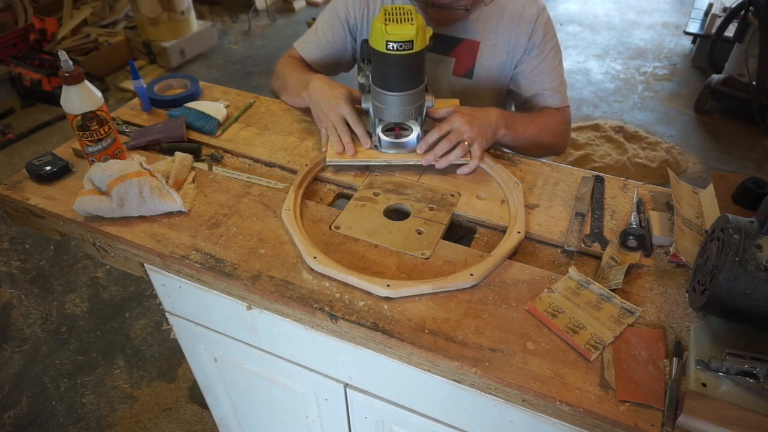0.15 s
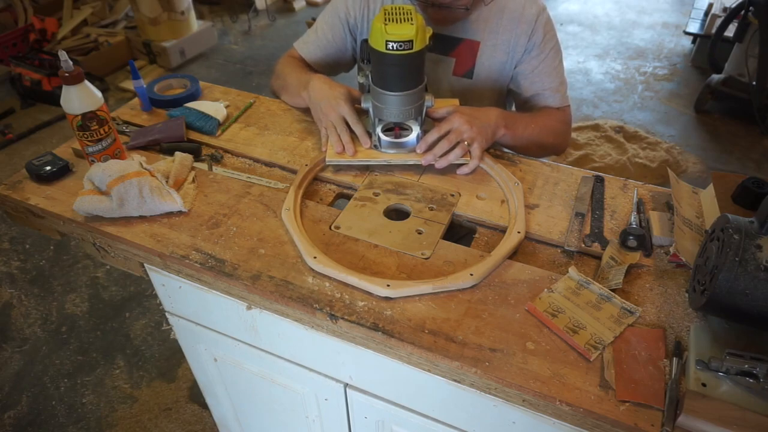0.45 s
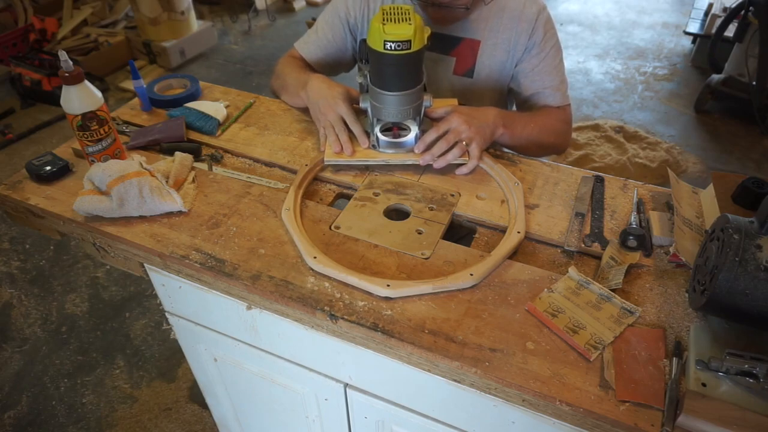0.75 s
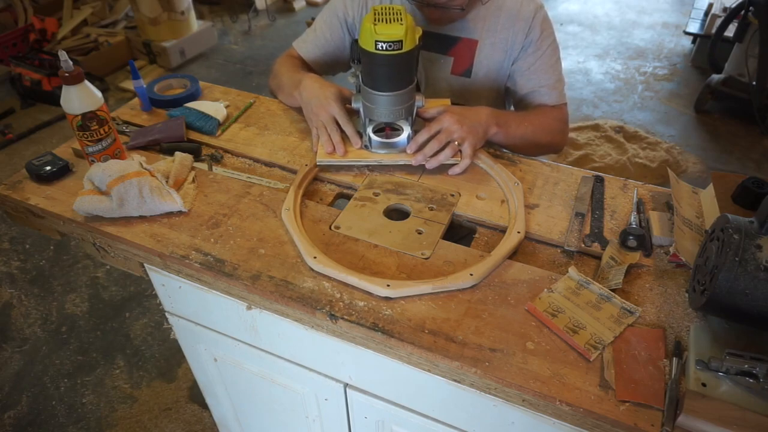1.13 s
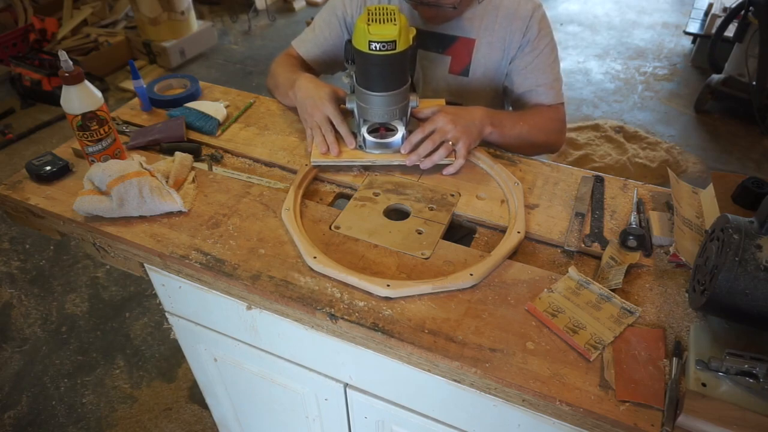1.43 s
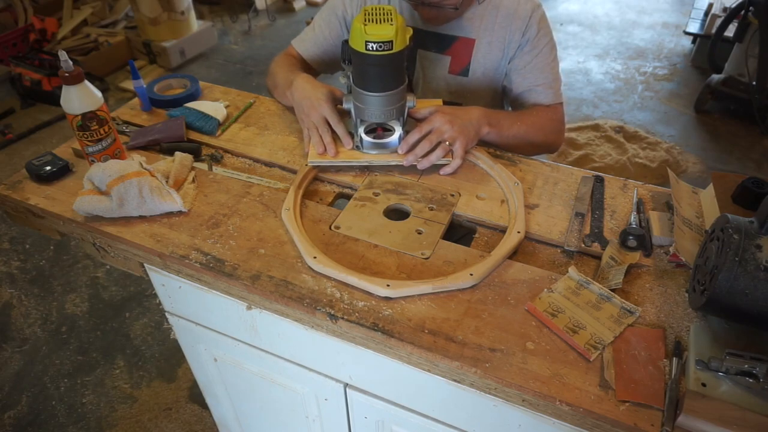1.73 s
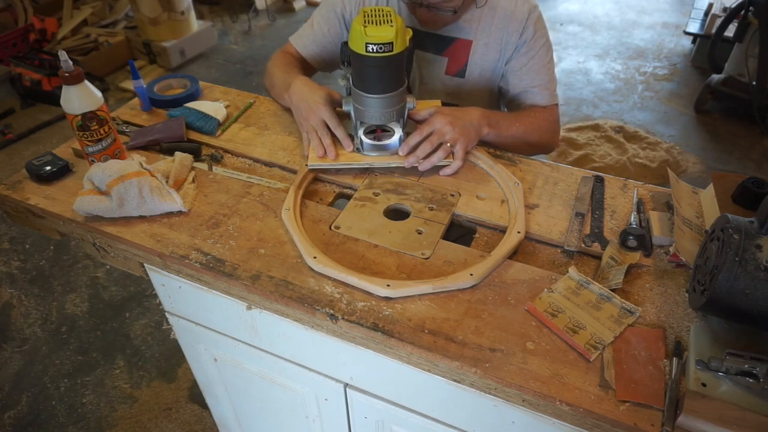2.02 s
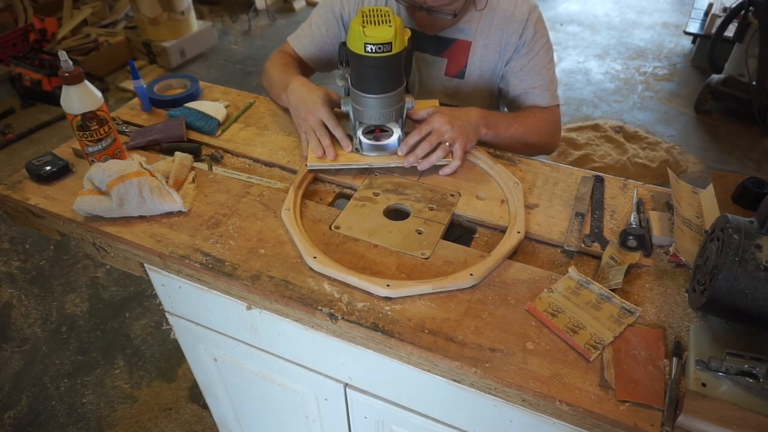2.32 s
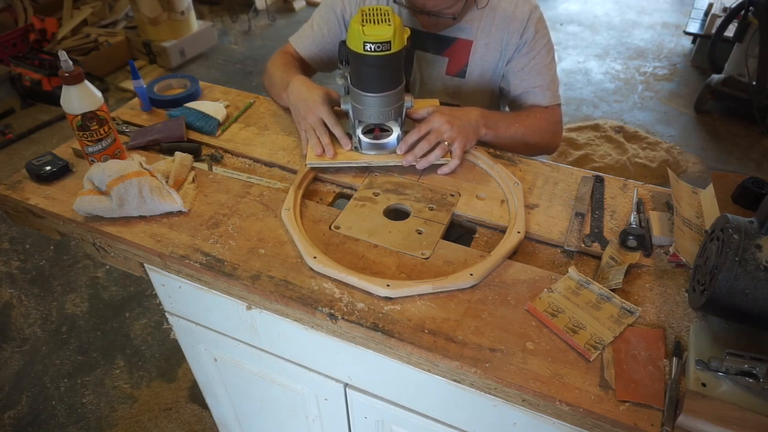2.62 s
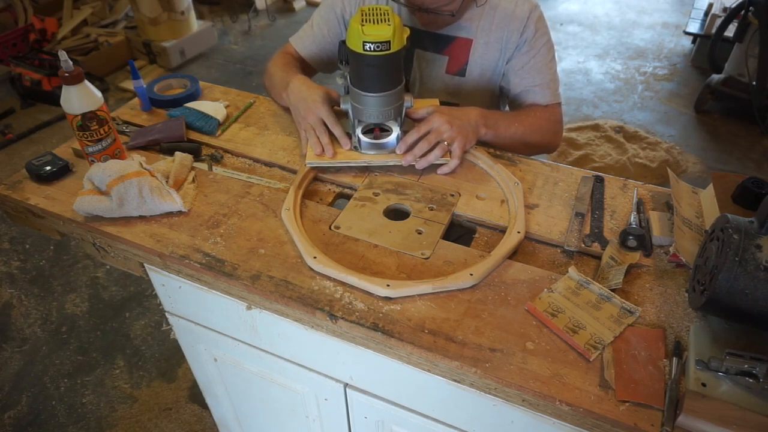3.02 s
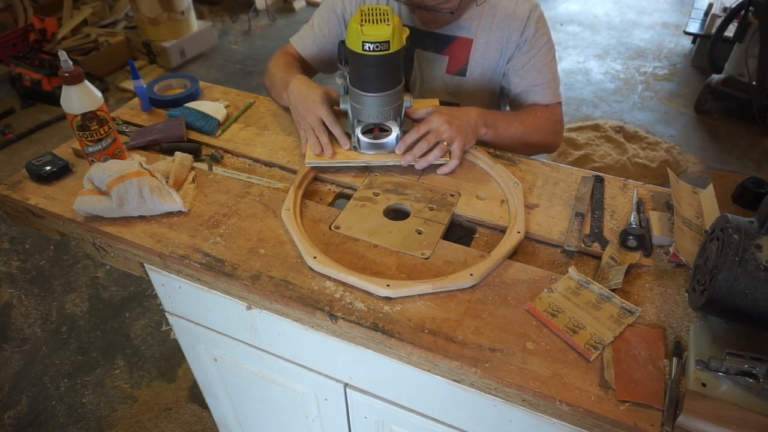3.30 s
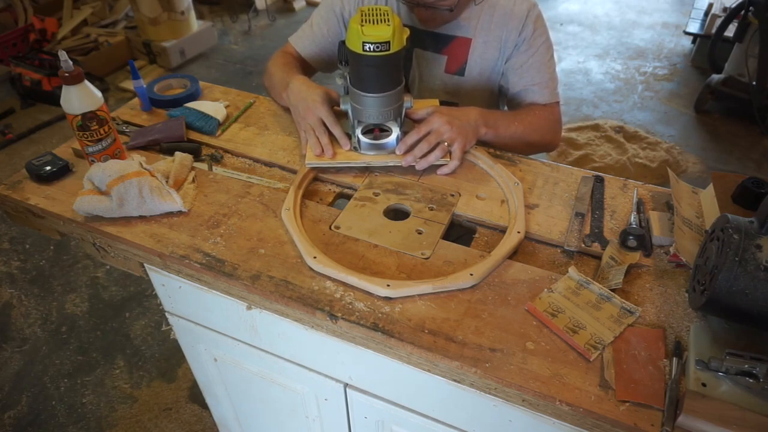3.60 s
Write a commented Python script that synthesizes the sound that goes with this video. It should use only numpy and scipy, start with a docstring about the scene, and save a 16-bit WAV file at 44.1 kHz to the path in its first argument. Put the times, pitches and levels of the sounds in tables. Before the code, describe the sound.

A handheld electric router runs at full speed on a workshop bench, its high whine sagging slightly and turning harsher as it cuts wood. Cooling air hisses loudly, and the exhaust flutters low on the close stereo microphone.

```python
"""At a workshop bench, a stereo microphone close to a handheld router that trims a wooden hoop flat out.
The spindle's whine sags and grows harsher where the bit bites, over a loud rush of cooling air that
rings in the housing. The exhaust blows straight on the microphone as a low flutter, which eases as
the tool moves along."""
import sys
import numpy as np
from scipy.fft import rfft, irfft, next_fast_len
from scipy.io import wavfile
from scipy.ndimage import uniform_filter1d, map_coordinates

SR = 44100
rng = np.random.default_rng(int(sys.argv[2]) if len(sys.argv) > 2 else 0)


def transcribe(signal):
    """Save signal, clipped to [-1, 1], as a 16-bit WAV file at the path in sys.argv[1]."""
    frames = np.atleast_2d(signal).T
    limited = np.clip(frames, -1, 1)
    pcm = np.round(limited * 32767).astype(np.int16)
    wavfile.write(sys.argv[1], SR, pcm)


N = 165375

# The spindle, slowing in the cuts. Each row: time in seconds, revolutions per second.
SPINDLE_SPEED = [(0.0, 430.3), (0.35, 428.7), (0.4, 429.6), (0.85, 428.7), (0.9, 427.6), (1.05, 427.9),
                 (1.25, 426.8), (1.55, 428.3), (1.95, 435.2), (2.2, 437.1), (2.7, 436.5), (2.8, 434.1),
                 (2.85, 430.7), (3.0, 433.1), (3.35, 425.2), (3.4, 426.0), (3.6, 434.6), (3.75, 435.7)]
# The whine's first and seventh partials. Each row: time in seconds, level in dB.
FIRST_PARTIAL = [(0.0, -41.5), (0.4, -46), (1.4, -35.5), (1.85, -37), (2.0, -33), (3.5, -40), (3.75, -33)]
SEVENTH_PARTIAL = [(0, -40), (.7, -42), (.92, -38), (1.08, -39), (1.22, -31), (1.36, -37), (1.6, -40),
                   (1.8, -55), (2.7, -55), (2.86, -35), (2.96, -46), (3.08, -39), (3.3, -38), (3.6, -49)]
# The third and fifth partials wander as the tool moves; the fourth flares as the bit digs in.
# Each row: time in seconds, level in dB, left over right in dB, left's lead in radians.
THIRD_PARTIAL = [(0, -30.5, 5.5, .8), (.55, -34, -6, 0.9), (.75, -25.5, 12, .8), (1.7, -25, 16, 0.89),
                 (1.9, -33, 14, 1.4), (2.08, -27, -2, 1.9), (2.8, -31, 1, 2.1), (2.9, -26, 12, 1.2),
                 (3.05, -40, 9, 1), (3.15, -28.5, 6, 1.3), (3.75, -31, 10, 1)]
FOURTH_PARTIAL = [(0, -47, 4, 3.6), (.8, -46, 5, 3.9), (1.3, -33, 9, 3.6), (1.65, -38, 9, 3.9),
                  (1.82, -31, 2, 4.3), (2.05, -46, -1, 3.2), (2.7, -42, 0, 3.4), (2.82, -27, 2, 4.6),
                  (2.94, -34, 0, 4), (3.06, -31, 2, 4.9), (3.24, -34, 0, 5.3), (3.34, -27, -2, 3.1),
                  (3.48, -46, 0, 3.6), (3.6, -37.5, 1, 4.1), (3.75, -42, 1, 3.6)]
FIFTH_PARTIAL = [(0, -33.5, -12, 4.3), (.85, -39, -8, 4.4), (1.25, -33, -6, 3.8), (1.58, -37, -16, 5),
                 (1.7, -26.5, -3, 4.8), (1.84, -27.5, 0, 4.2), (1.98, -31, -14, 4.1), (2.7, -30, -15, 3.6),
                 (2.82, -25, -2, 4.6), (3.05, -25, -4, 4.5), (3.17, -32, -10, 4.5), (3.4, -30, 1, 3.4),
                 (3.5, -33, -5, 4.9), (3.6, -28, -5, 4.1), (3.75, -31, -4, 3.9)]
# How hard the bit bites. Each row: time in seconds, strength in relative dB.
BIT_BITE = [(0, -40), (.35, -39), (.45, -35), (.58, -39), (.8, -36), (.95, -29), (1.2, -25), (1.6, -26.5),
            (1.84, -26.5), (1.94, -35), (2.3, -33.5), (2.72, -35), (2.79, -26), (2.85, -24), (2.93, -29),
            (3.03, -25.5), (3.18, -26.5), (3.34, -24), (3.42, -32), (3.75, -35)]
# The cutting tone, an octave up. Each row: partial number, level in dB at average bite,
# dB gained per dB of bite, left over right in dB.
CUTTING_TONES = [(2, -31.5, 1, 6.5)]
# The squeal, strongest in the last, heaviest cut. Each row: time in seconds, level in dB.
SQUEAL_LEVEL = [(0, -51), (.9, -52), (1.2, -53), (1.65, -48), (1.95, -57), (2.7, -54), (2.83, -44),
                (2.95, -50), (3.08, -45), (3.38, -40), (3.52, -51), (3.75, -48)]
# Its partials. Each row: partial number, offset from that level in dB.
SQUEAL_PARTIALS = [(6, 2), (8, -5), (9, 0)]
# How the router reaches the microphone's two ports. Each row: frequency in Hz, left over right in dB,
# likeness of the sides from 0 to 1, left's lead in radians.
MIC_PORTS = [(500, 6, 1, -1.5), (1300, 0, 0.92, 0.05), (1900, .8, 1, .05), (2600, 5, 0.8, 0.5),
             (3300, 6.5, 0.95, 0.5), (3920, 6.5, 0.79, 0.57), (4400, -3, 0.78, 0.5), (4780, 9, 0, 0.8),
             (5000, 7, 0.1, 0.85), (5500, 11, 0.62, 2), (6580, 2, 0.57, 4), (7260, -3.5, 0.91, 4),
             (7900, 1, .58, 4), (10600, -3.5, 0.24, 4.5), (11700, -1, 0.3, 3.5), (11800, -2, 0.56, 7),
             (14700, 0, 0.73, 7)]

# The rush of cooling air. Each row: frequency in Hz, spectral density in relative dB.
RUSH_SPECTRUM = [(200, -29), (900, -31.5), (1200, -22.5), (1550, -17.5), (1900, -8), (2450, -3), (3150, -4),
                 (3700, -3.5), (4200, 1.5), (4900, -4), (5550, -3.5), (6400, -8), (7000, -9), (7550, -5),
                 (8100, -13), (8800, -12.5), (10400, -12), (11600, -15), (13500, -18), (15600, -13.5)]
# Its body and its topmost fizz. Each row: time in seconds, level in relative dB.
RUSH_LEVEL = [(0, -25.4), (.75, -25.3), (1.25, -26.5), (1.8, -26.3), (2.1, -25.9), (2.65, -25.9),
              (2.85, -27.9), (3.13, -26.3), (3.32, -27.6), (3.55, -26.4), (3.75, -26.8)]
FIZZ_LEVEL = [(0, -1), (.68, -0.5), (1.5, -2), (2.78, -1.5), (3.18, -1), (3.3, -3), (3.43, 0), (3.75, -2)]
# Housing resonances, and hollows where reflections off the bench cancel the rush.
# Each row: centre in Hz, width in Hz, gain in dB.
HOUSING_MODES = [(1412, 64, 5.5), (2006, 39, 8), (2317, 25, 6), (2444, 50, 3.5), (2760, 35, 4),
                 (3100, 50, 4.5), (3705, 76, 8), (3856, 33, 5), (4084, 54, 1.5), (4570, 32, 2),
                 (4716, 85, 5.5), (5360, 34, 5.5), (5430, 40, 5.5), (6150, 94, 5)]
BENCH_HOLLOWS = [(1630, 53, -2.5), (1860, 50, 0.5), (2040, 35, -5), (2205, 20, -2), (2700, 29, -7.5),
                 (3114, 71, -6), (3570, 46, -0.5), (4410, 53, -5.5), (4616, 42, -7), (4885, 54, -2),
                 (5020, 51, -5.5), (5460, 40, -3), (6300, 98, -6), (6680, 97, -6)]

# Exhaust on the microphone: low buffeting and a softer draught above it.
# Each row: frequency in Hz, spectral density in relative dB.
BUFFET_SPECTRUM = [(12, -51), (22, -12), (33, -11), (46, 0.5), (60, 0.5), (74, -11), (95, -12.5),
                   (130, -13.5), (165, -28.5), (300, -57), (800, -73)]
DRAUGHT_SPECTRUM = [(80, -9), (170, -0.5), (250, -1.5), (400, -8), (700, -13.5), (1100, -17), (1800, -28)]
# Both ease as the tool moves along. Each row: time in seconds, level in relative dB.
BUFFET_STRENGTH = [(0, -23.5), (.25, -22), (.42, -23.5), (.55, -22), (.75, -24.5), (1.15, -20.5),
                   (1.5, -21.5), (1.6, -25), (1.67, -21.5), (2.0, -27), (2.6, -26.5), (3.1, -27),
                   (3.38, -30), (3.5, -24.5), (3.75, -31)]
DRAUGHT_STRENGTH = [(0, -40), (.7, -40), (1.55, -44.5), (1.78, -43), (1.95, -43.5), (2.3, -43.5),
                    (3.0, -50), (3.75, -55)]


def amp(db):
    """Decibels to gain."""
    return 10 ** (np.asarray(db) / 20)


def unit(x):
    """Scale to rms 1."""
    return x / np.sqrt(np.mean(x ** 2) + 1e-20)


def at_hz(rows, hz):
    """Each column after the frequency, read at hz on a log axis."""
    row_hz, *columns = np.transpose(rows)
    return [np.interp(np.log(hz + 1), np.log(row_hz + 1), column) for column in columns]


def curves(rows):
    """One value per sample for each column after the time."""
    seconds, *columns = np.transpose(rows)
    return [np.interp(np.arange(N) / SR, seconds, column) for column in columns]


def wobble(per_s):
    """A smooth random curve with per_s knots a second."""
    return map_coordinates(rng.standard_normal(4096), [np.arange(N) * per_s / SR], mode="wrap")


def filtered(x, response):
    """Shape x by a gain that is a function of frequency."""
    size = next_fast_len(N + SR // 4)
    hz = np.fft.rfftfreq(size, 1 / SR)
    return irfft(rfft(x, size) * response(hz), size)[..., :N]


def panned(side_db):
    """Left and right gains of constant total power, left louder by side_db."""
    gains = amp(np.vstack([side_db, -side_db]) / 2)
    return gains / np.sqrt(np.mean(gains ** 2, axis=0))


def spindle_whine(beats_per_turn=4, jitter=0.00036, flutter_db=1.7, wander_db=5, drift_rad=0.053):
    """Partials locked to the spindle; the bite brings out overtones, which drift between the ports."""
    speed = uniform_filter1d(curves(SPINDLE_SPEED)[0], SR // 20)
    pitch_hz = beats_per_turn * speed * (1 + jitter * wobble(70))
    phase = 2 * np.pi * np.cumsum(pitch_hz) / SR

    def partial(order, level_db, side_db, lead=None):
        if lead is None:
            _, _, port_lead = at_hz(MIC_PORTS, order * pitch_hz.mean())
            lead = port_lead + drift_rad * (order - 1) * wobble(4.16)
        gain = amp(level_db + flutter_db * wobble(45)) * panned(side_db)
        return gain * np.sin(order * phase + np.array([lead, -lead]) / 2)

    whine = partial(1, curves(FIRST_PARTIAL)[0], side_db=0)
    for order, rows in (3, THIRD_PARTIAL), (4, FOURTH_PARTIAL), (5, FIFTH_PARTIAL):
        whine += partial(order, *curves(rows))
    whine += partial(7, curves(SEVENTH_PARTIAL)[0], side_db=-3)
    bite_db, = curves(BIT_BITE)
    bite_db -= bite_db.mean()
    for order, level_db, growth, side_db in CUTTING_TONES:
        whine += partial(order, level_db + growth * bite_db, side_db + wander_db * wobble(4.81))
    for order, offset_db in SQUEAL_PARTIALS:
        squeal_db = curves(SQUEAL_LEVEL)[0] + offset_db + wander_db * wobble(12)
        whine += partial(order, squeal_db, side_db=wander_db * wobble(8.6))
    return whine


def cooling_air(hiss_hz=5460, fizz_hz=12300, ripple_db=1.5, ripple_spacing_hz=60.15):
    """Fan turbulence coloured by housing and bench, a little different at each microphone port."""
    ripples = rng.standard_normal(2048)

    def likeness(hz):
        _, correlation, _ = at_hz(MIC_PORTS, hz)
        angle = np.arccos(np.clip(correlation, 0, 1)) / 2
        return np.array([np.cos(angle), np.sin(angle)])

    def colour(hz):
        peaks_and_dips_db = sum(db / (1 + (2 * (hz - centre) / width) ** 2)
                                for centre, width, db in HOUSING_MODES + BENCH_HOLLOWS)
        # The shop's many reflections leave a fine ripple on the spectrum.
        shop_db = ripple_db * map_coordinates(ripples, [hz / ripple_spacing_hz], mode="wrap")
        gain = amp(at_hz(RUSH_SPECTRUM, hz)[0] + peaks_and_dips_db + shop_db)
        side_db, _, lead = at_hz(MIC_PORTS, hz)
        return gain * panned(side_db) * np.exp(0.5j * np.array([lead, -lead]))

    mid, side = filtered(rng.standard_normal((2, N)), likeness)
    rush = unit(filtered(np.array([mid + side, mid - side]), colour))
    body = filtered(rush, lambda hz: 1 / (1 + (hz / hiss_hz) ** 8))
    fizz = filtered(rush, lambda hz: 1 - 1 / (1 + (hz / fizz_hz) ** 16))
    hiss = rush - body - fizz
    level_db, = curves(RUSH_LEVEL)
    hiss *= amp(level_db.mean() + 0.48 * wobble(10))  # steady but for a slight flicker
    fizz *= amp(level_db.mean() + curves(FIZZ_LEVEL)[0] + 0.7 * wobble(16))
    body *= amp(level_db + 0.28 * wobble(14))
    return body + hiss + fizz


def housing_ring(pitch_hz=4728, width_hz=30, level_db=-38.5):
    """One housing mode sings a narrow, fuzzy tone to the left, whatever the spindle's speed."""
    drive = wobble(width_hz) + 1j * wobble(width_hz)
    carrier = np.exp(2j * np.pi * pitch_hz * np.arange(N) / SR)
    tone = unit(np.real(drive * carrier))
    return amp(level_db) * panned(side_db=5) * tone


def exhaust(spectrum, strength, shared_gain, gust_db=1, gusts_per_s=8.02):
    """Gusts of air on the microphone's ports, mostly unrelated from left to right."""
    eddies = rng.standard_normal((2, N)) + shared_gain * rng.standard_normal(N)
    wind = unit(filtered(eddies, lambda hz: amp(at_hz(spectrum, hz)[0])))
    return wind * amp(curves(strength)[0] + gust_db * wobble(gusts_per_s))


def scene():
    """The router at close range and the air it blows at the microphone, all sounding from the start."""
    router = spindle_whine() + amp(5.5) * cooling_air() + housing_ring()
    buffet = amp(3.5) * exhaust(BUFFET_SPECTRUM, BUFFET_STRENGTH, shared_gain=0)
    draught = amp(4.5) * exhaust(DRAUGHT_SPECTRUM, DRAUGHT_STRENGTH, shared_gain=0.54)
    return router + buffet + draught * panned(side_db=-1.7)


def record(dry, top_hz=15750):
    """The microphone passes nothing above top_hz."""
    return filtered(dry, lambda hz: hz < top_hz)


dry = scene()
out = record(dry)
transcribe(out)
```